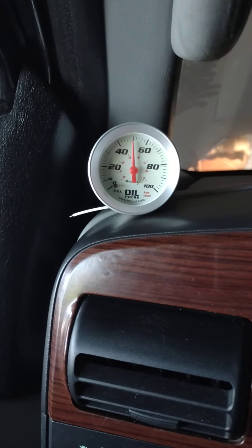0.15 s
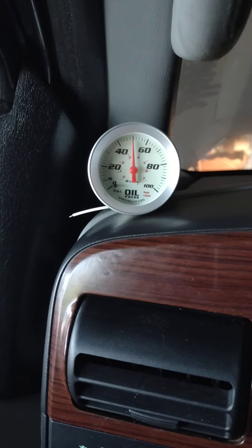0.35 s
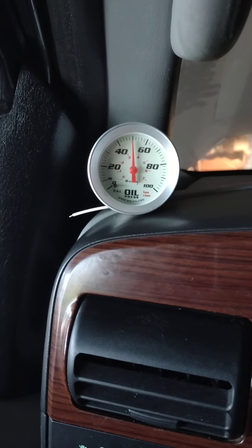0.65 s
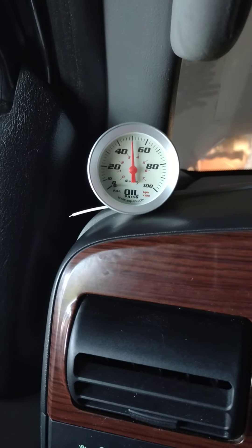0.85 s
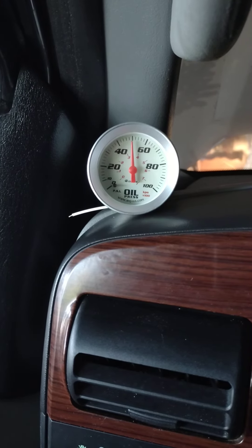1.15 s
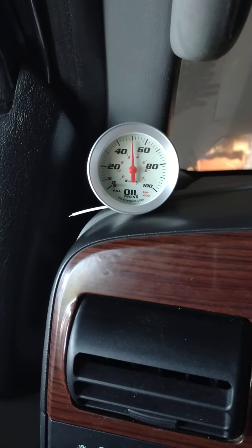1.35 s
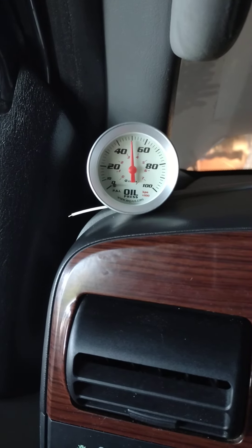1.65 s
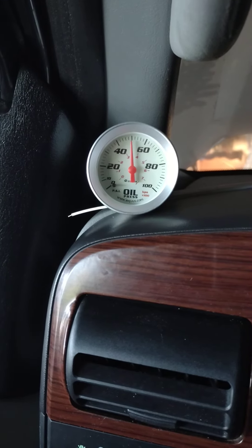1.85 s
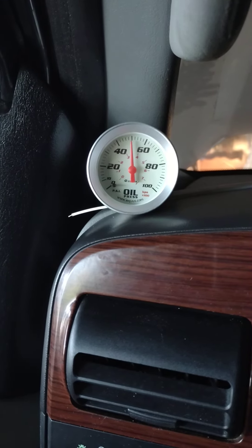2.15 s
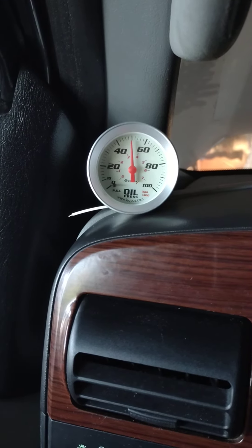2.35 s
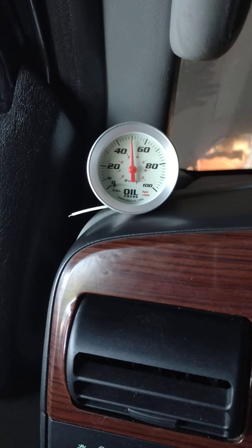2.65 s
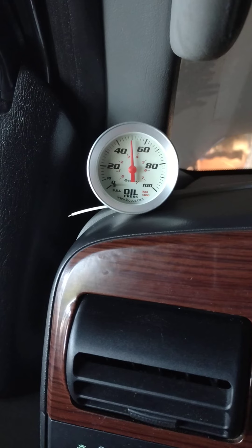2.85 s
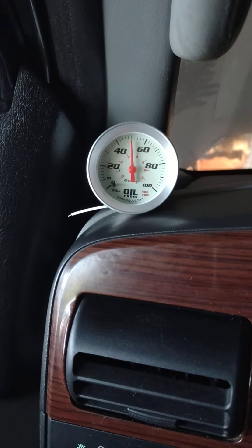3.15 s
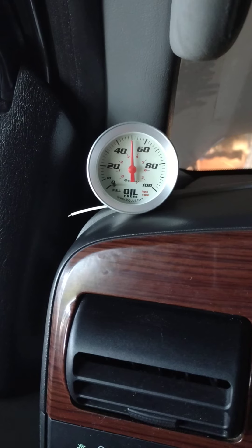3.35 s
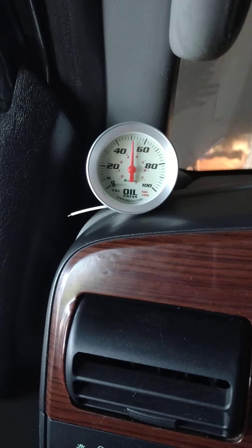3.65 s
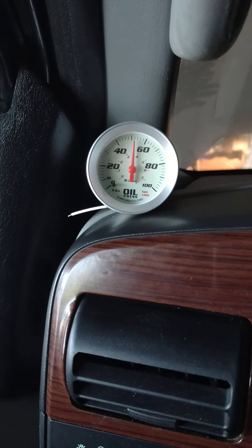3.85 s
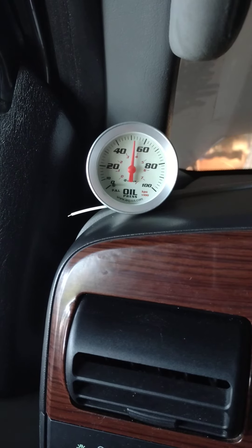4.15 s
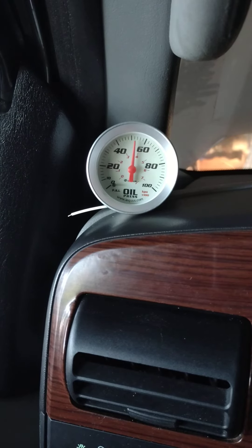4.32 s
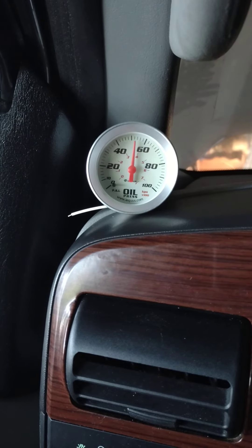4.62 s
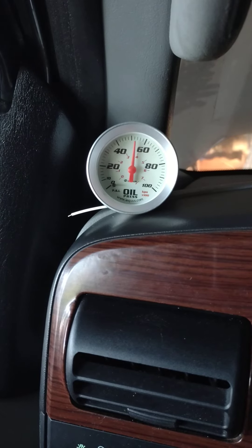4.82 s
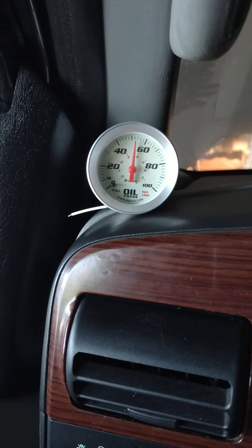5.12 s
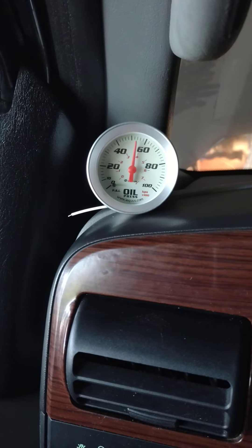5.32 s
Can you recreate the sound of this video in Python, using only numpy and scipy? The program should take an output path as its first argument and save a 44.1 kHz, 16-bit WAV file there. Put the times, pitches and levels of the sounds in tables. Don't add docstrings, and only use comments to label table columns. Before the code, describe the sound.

A V8 truck engine idles with a low uneven burble inside the cab, plastic clicks twice, then two throttle blips roar up.

```python
import sys
import numpy as np
from scipy import signal
from scipy.fft import rfft, irfft, next_fast_len
from scipy.io import wavfile
from scipy.ndimage import uniform_filter1d, map_coordinates

SR = 44100
rng = np.random.default_rng(int(sys.argv[2]) if len(sys.argv) > 2 else 0)


def invert_db(level):
    return 10 ** (np.asarray(level, dtype=float) / 20)


def inscribe(sig):
    pcm = np.round(np.clip(np.atleast_2d(sig).T, -1, 1) * 32767)
    wavfile.write(sys.argv[1], SR, pcm.astype(np.int16))


N = 241602

IDLE_HZ, MIDDLE_HZ = 5.5, 10
STEP = 32


def unit(x):
    return x / np.sqrt(np.mean(x ** 2) + 1e-20)


def curves(rows):
    time_s, *columns = np.transpose(rows)
    return [np.interp(np.arange(N) / SR, time_s, column) for column in columns]


def wobble(rate_hz, step=1):
    knots = rng.standard_normal(int(N * rate_hz / SR) + 4)
    return map_coordinates(knots, [np.arange(0, N, step) * rate_hz / SR])


def bell(hz, centre_hz, width_hz):
    return 1 / (1 + (2 * (hz - centre_hz) / width_hz) ** 2)


def noise(spectrum, rings=(), count=N):
    size = next_fast_len(count + 8192)
    hz = np.fft.rfftfreq(size, 1 / SR)
    f, level_db = np.transpose(spectrum)
    db = np.interp(np.log(hz + 1), np.log(f + 1), level_db)
    db = db + sum(lift_db * bell(hz, centre, width) for centre, width, lift_db in rings)
    return unit(irfft(rfft(rng.standard_normal(size)) * invert_db(db), size)[:count])


def modes(table, hz):
    return sum(gain * 1j * hz * width / (f * f - hz * hz + 1j * hz * width) for f, width, gain in table)


def firing_beat(angle):
    return np.cos(2 * np.pi * 8 * angle)


def near_bank(angle):
    return np.cos(2 * np.pi * (angle - .91))


# f/Hz, level/dB per Hz
RUMBLE_SPECTRUM = [(12, -40), (25, -16), (45, -3), (90, 2), (150, 0), (215, 0), (245, -8), (450, -10),
                   (600, -30), (1000, -90)]
# f/Hz, level/dB per Hz
CAB_SPECTRUM = [(210, -26.5), (350, -7.5), (468, -8.5), (520, -9.5), (813, -11), (1130, -15), (1490, -16),
                (2200, -19), (3050, -24.5), (3350, -35), (5000, -38), (7600, -41.5), (8100, -58),
                (8300, -120)]
# f/Hz, width/Hz, lift/dB
DASH_RINGS = [(295, 14, 4), (403, 16, 4), (463, 12, 7), (625, 40, 3), (702, 16, 3), (1500, 60, 3)]


def cab_noise():
    rumble = invert_db(-56) * noise(RUMBLE_SPECTRUM)
    return rumble + invert_db(-60 + 0.1 * wobble(9.8)) * noise(CAB_SPECTRUM, DASH_RINGS)


# t/s, snap level/dB, thud level/dB, ring f/Hz, treble tilt/dB per octave
TRIM_CLICKS = [
    (2.225, -36, -64, 2040, 2),
    (2.2299, -31, -43, 2000, 5),
    (2.238, -31.5, -75, 1563, -4.5),
    (2.6533, -42, -52, 1704, -11),
    (2.666, -54.5, -26, 850, -4),
]
# f/Hz, level/dB per Hz
TRIM_SPECTRUM = [(120, -39), (280, -6.5), (450, -15.5), (750, -1), (1100, -6.5), (1400, -4.5), (2000, -3),
                 (2420, -3.5), (3050, -10), (3600, -19), (4500, -18.5), (6500, -22.5), (7800, -27.5),
                 (8400, -48), (8800, -120)]
SNAP_T60_S, RING_T60_S, THUD_T60_S = 0.093, 0.034, 0.18
OVERTONE_RATIO = 1.94


def trim():
    out = np.zeros(N + SR)
    t = np.arange(SR // 4) / SR
    for start_s, snap_db, thud_db, ring_hz, tilt_db in TRIM_CLICKS:
        colour = [(hz, db + tilt_db * max(0, np.log2(hz / 3300))) for hz, db in TRIM_SPECTRUM]
        burst = invert_db(-60 * t / SNAP_T60_S) * noise(colour, count=len(t))
        ring = np.sin(2 * np.pi * ring_hz * t) + 0.23 * np.sin(2 * np.pi * OVERTONE_RATIO * ring_hz * t)
        snap = burst + invert_db(2.5 - 60 * t / RING_T60_S) * ring
        snap = invert_db(snap_db) * (1 - np.exp(-t / 0.00042)) * snap
        thud = invert_db(thud_db - 60 * t / THUD_T60_S) * (1 - np.exp(-t / 0.00064)) * np.sin(2 * np.pi * 122 * t)
        out[round(start_s * SR):][:len(t)] += snap + thud
    return out[:N]


# order, level/dB
BELT_ORDERS = [(53.9, -71), (73.3, -69.5), (84, -63), (127.5, -78)]


def belts(angle, cycle_hz):
    out = np.zeros(N)
    fade_db = -7 * np.log2(cycle_hz / IDLE_HZ)
    for order, db in BELT_ORDERS:
        level = invert_db(db + fade_db + 1.2 * wobble(8))
        out += level * np.sin(2 * np.pi * order * angle + .3 * wobble(12))
    return out


EDGE_HZ, EDGE_HZ_PER_OCTAVE, EDGE_HZ_PER_DB = 6800, 460, 10.5
FLOW_DB, FLOW_DB_PER_OCTAVE = -87.5, 10
CATCH_DB, CATCH_HZ, CATCH_WIDTH_HZ, SHUT_DB = -80.5, 9.4, 1.2, -24


def whistle(cycle_hz, throttle_db):
    octaves = np.log2(cycle_hz / MIDDLE_HZ)
    edge_hz = EDGE_HZ + EDGE_HZ_PER_OCTAVE * octaves + EDGE_HZ_PER_DB * throttle_db
    phase = 2 * np.pi * np.cumsum(edge_hz) / SR
    catch = invert_db(CATCH_DB + .25 * (SHUT_DB - throttle_db))
    catch = catch * np.exp(-((cycle_hz - CATCH_HZ) / CATCH_WIDTH_HZ) ** 4)
    flow = invert_db(FLOW_DB + FLOW_DB_PER_OCTAVE * octaves + 0.44 * throttle_db)
    upper = wobble(500) * np.sin(phase)
    lower = invert_db(-3) * wobble(400) * np.sin(.745 * phase)
    return (catch + flow) * (upper + lower)


# f/Hz, level/dB per Hz
SHIELD_SPECTRUM = [(1100, -59.5), (1350, -10), (1480, 5.5), (1600, -7.5), (1720, 1), (1900, -8.5),
                   (2100, -32), (2600, -82.5)]


def shield(angle, level):
    return level * invert_db(0.46 * wobble(25)) * (1 + 0.17 * firing_beat(angle)) * noise(SHIELD_SPECTRUM)


# f/Hz, width/Hz, lift/dB
COVER_RINGS = [(810, 83, 2.5), (1460, 110, 2), (1720, 70, 2), (2350, 120, 0.5), (2750, 130, 3.5),
               (4080, 59, 3)]
# f/Hz, level/dB per Hz
INTAKE_SPECTRUM = [(2000, -51), (3000, -11), (3400, 2), (4100, 0), (5200, -5), (5700, -10.5), (7000, -12.5),
                   (7700, -16), (8100, -36), (8300, -120)]


def intake(level):
    return level * invert_db(0.69 * wobble(20)) * noise(INTAKE_SPECTRUM, COVER_RINGS)


# f/Hz, level/dB per Hz
GEAR_SPECTRUM = [(320, -26), (550, -1), (770, 0.5), (1200, -3), (1270, -5), (1480, -6.5), (1600, -11.5),
                 (1740, -2), (2150, -10), (2420, -7), (3050, -16), (3960, -46), (6710, -120)]


def valve_gear(angle, level):
    pulse = 1 + 0.086 * firing_beat(angle)
    return level * invert_db(0.59 * wobble(11)) * pulse * noise(GEAR_SPECTRUM, COVER_RINGS)


# f/Hz, level/dB per Hz
KNOCK_SPECTRUM = [(230, -39.5), (292, 0), (350, -9), (460, -4.5), (590, -7), (720, -41), (900, -120)]


def floor_knock(angle):
    return invert_db(-67) * (.5 + .5 * near_bank(angle)) ** 2 * noise(KNOCK_SPECTRUM)


# f/Hz, level/dB per Hz
GROWL_SPECTRUM = [(25, -40), (45, -3.5), (100, -0.5), (220, -3.5), (245, -16.5), (300, -12), (420, -18),
                  (490, -33.5), (700, -37), (910, -58), (1540, -120)]
# f/Hz, width/Hz, lift/dB
PANEL_RINGS = [(163, 140, 7), (189, 48, -2.5), (215, 8.5, 8), (288, 9.2, 7.5), (376, 41, 6.5), (416, 12, 7)]


def growl(angle, level):
    pulse = 1 + 0.24 * firing_beat(angle)
    return level * invert_db(0.5 * wobble(40)) * pulse * noise(GROWL_SPECTRUM, PANEL_RINGS)


# level/dB, rise/dB per octave of speed, share/dB per dB of throttle
LAYER_LEVELS = [
    (-40.5, 10.5, 0.12),
    (-55.5, 12.5, 0.08),
    (-76.5, 10, .22),
    (-69.5, 14.5, -0.38),
]
WAKE_HZ, BUZZ_FROM_HZ, BUZZ_SPAN_HZ = 5.6, 8.6, 2.2
SURGE_DB = 2


def layer_levels(cycle_hz, throttle_db):
    octaves = np.log2(cycle_hz / MIDDLE_HZ)
    awake = np.clip(14 * (cycle_hz / WAKE_HZ - 1), .03, 1)
    levels = [awake * invert_db(db + rise_db * octaves + share * throttle_db) for db, rise_db, share in LAYER_LEVELS]
    surge = uniform_filter1d(np.gradient(np.log2(cycle_hz)) * SR, size=SR // 10)
    levels[0] = levels[0] * invert_db(SURGE_DB * np.clip(surge, 0, None))
    levels[-1] = levels[-1] * np.clip((cycle_hz - BUZZ_FROM_HZ) / BUZZ_SPAN_HZ, .1, 1)
    return levels


# exhaust level/dB, exhaust lag/crank deg, block level/dB, block lag/crank deg
CYLINDER_BLOWS = [(-9.6, -3.0, 0.5, -37.2), (2.9, -5.1, -5.3, -50.5), (4.4, -5.5, -4.9, -26.6),
                  (1.2, -6.5, 2.4, -37.6), (4.4, -8.4, 1.1, -44.0), (3.5, -9.8, -0.3, -41.3),
                  (-6.6, 24.6, -1.1, -38.8), (-0.2, -12.4, 7.6, -44.3)]
# f/Hz, width/Hz, signed gain
BOOM_MODES = [(57.27, 11.0, 1.23), (95.61, 26.8, -1.46), (126.9, 26.99, 0.52)]
# f/Hz, width/Hz, signed gain
BLOCK_MODES = [(148, 34, -.5), (210, 20.7, -2.09), (213.9, 18.9, 2.05), (279.3, 40.6, -.08)]


def strength(order, cycle_hz, exhaust=1):
    exhaust_db, exhaust_lag_deg, block_db, block_lag_deg = np.transpose(CYLINDER_BLOWS)

    def blows(db, lag_deg):
        turns = np.arange(8) / 8 + lag_deg / 720
        return np.sum(invert_db(db) * np.exp(-2j * np.pi * order * turns))

    hz = order * cycle_hz
    bass_cut = (1j * hz / (70 + 1j * hz)) ** 2
    boom = exhaust * blows(exhaust_db, exhaust_lag_deg) * modes(BOOM_MODES, hz)
    block = blows(block_db, block_lag_deg) * modes(BLOCK_MODES, hz)
    return bass_cut * (boom + block)


STRONG_ORDERS = [
    5,
    6,
    7,
    8,
    16,
]
# pipe level/dB, mount level/dB, pipe change off idle/dB
STRONG_LEVELS = [(-16.5, -32, 0.5), (-36.5, -17, 1.5), (-41, -28.5, 0.5), (-10.5, -23.5, 0),
                 (-13, -36.5, -8)]
# f/Hz, level/dB
PIPE_RESPONSE = [(28, -46.5), (45, -31.5), (60, -13.5), (78, -17), (94, 1), (107, -4), (128, -7.5),
                 (148, -21.5), (290, -24)]
# f/Hz, width/Hz, lift/dB
TAIL_PIPE_RINGS = [(162, 12, 23), (298, 11, 13)]
# f/Hz, width/Hz, level/dB
MOUNT_MODES = [(95.1, 10.4, 0.5), (151, 18, -14.5), (208.9, 16, 5.5)]
# f/Hz, width/Hz, lift/dB
BODY_CANCEL = (101.8, 5, -17)


def strong(order, hz, throttle_db, revved):
    pipe_db, mount_db, revved_db = STRONG_LEVELS[STRONG_ORDERS.index(order)]
    f, db = np.transpose(PIPE_RESPONSE)

    def lift(centre_hz, width_hz, top_db):
        return top_db * revved * bell(hz, centre_hz, width_hz)

    pulse_db = pipe_db + revved_db * revved + throttle_db + np.interp(np.log(hz), np.log(f), db)
    pulse_db = pulse_db + lift(106, 1.7, -9)
    if order == STRONG_ORDERS[-1]:
        pulse_db = pulse_db + sum(lift(*ring) for ring in TAIL_PIPE_RINGS)
    body = sum(invert_db(top_db) * bell(hz, centre, width) for centre, width, top_db in MOUNT_MODES)
    shaking = revved * invert_db(mount_db + lift(*BODY_CANCEL)) * body
    return np.hypot(invert_db(pulse_db), shaking)


OVERRUN_SHARE, IDLE_THROTTLE_DB = .6, -13.5


def firing(cycle_hz, angle, load_db, throttle_db):
    out = np.zeros(N)
    samples = np.arange(N)
    slow_hz, slow_angle = cycle_hz[::STEP], angle[::STEP]
    slow_load_db, slow_throttle_db = load_db[::STEP], throttle_db[::STEP]
    revved = np.clip(slow_hz / IDLE_HZ - 1, 0, 1)
    shut_db = np.clip(slow_throttle_db - IDLE_THROTTLE_DB - 4 * (1 - revved), None, 0)
    exhaust = invert_db(OVERRUN_SHARE * shut_db * revved)
    for order in range(2, 60):
        hz = order * slow_hz
        if order in STRONG_ORDERS:
            phase = np.angle(strength(order, IDLE_HZ))
            size = strong(order, hz, slow_throttle_db, revved) * np.exp(1j * phase)
            scatter_db = .35 + (order / 9) ** 2 * revved
        else:
            drown_db = -8 * revved / (1 + (170 / hz) ** 4)
            size = strength(order, slow_hz, exhaust) * invert_db(-59.0 + slow_load_db + drown_db)
            scatter_db = 1.2 + 3 * revved
        if order in (3, 11):
            size = size * invert_db(4.2 * revved - 8 * revved / (1 + (200 / hz) ** 12))
        if 30 < order < 43:
            size = size * (.95 + .3 * near_bank(slow_angle))
        jitter = np.exp(.03j * order * revved * wobble(16, STEP))
        size = size * invert_db(scatter_db * wobble(9, STEP)) * jitter
        size = np.interp(samples, samples[::STEP], size)
        out += np.real(size * np.exp(2j * np.pi * order * angle))
    return out


# t/s, four-stroke cycles per s
SPEED_CURVE = [(0.0, 5.55), (0.5, 5.565), (1.1, 5.505), (2.3, 5.474), (3.0, 5.53), (3.165, 6.05),
               (3.3, 9.8), (3.45, 12.1), (3.63, 16.1), (3.73, 17.0), (3.9, 16.65), (4.3, 12.65),
               (4.58, 10.9), (4.85, 9.3), (5.0, 9.75), (5.15, 12.0), (5.27, 15.4), (5.48, 19.4)]
# t/s, level/dB (0 = wide open)
THROTTLE_CURVE = [(0, -12.5), (.7, -12.5), (1.5, -14), (2.7, -14.5), (3.1, -14.5), (3.2, -13),
                  (3.31, -14.5), (3.34, 1.5), (3.6, -1.5), (3.72, -6), (3.87, -10), (3.96, -24),
                  (4.85, -32), (4.92, -16), (5.02, -10), (5.09, -1.5), (5.33, 1), (5.48, -0.5)]
# cycles per s, level/dB
BURN_CURVE = [(5.5, -1.5), (7.5, 2), (9.5, 0), (12, 5), (14, 13.5), (17, 12)]
START_CYCLES = -.018
BURN_DB_PER_THROTTLE_DB = 0.086


def scene():
    (cycle_hz,), (throttle_db,) = curves(SPEED_CURVE), curves(THROTTLE_CURVE)
    angle = START_CYCLES + np.cumsum(cycle_hz) / SR
    load_db = np.interp(cycle_hz, *np.transpose(BURN_CURVE)) + BURN_DB_PER_THROTTLE_DB * throttle_db
    growl_level, gear_level, intake_level, shield_level = layer_levels(cycle_hz, throttle_db)
    mix = cab_noise() + trim()
    mix += belts(angle, cycle_hz) + whistle(cycle_hz, throttle_db)
    mix += shield(angle, shield_level) + intake(intake_level) + valve_gear(angle, gear_level)
    mix += floor_knock(angle) + growl(angle, growl_level)
    mix += firing(cycle_hz, angle, load_db, throttle_db)
    return mix[None]


def top_cut(x):
    return signal.sosfilt(signal.butter(12, 8230, fs=SR, output="sos"), x)


def record(dry):
    return top_cut(dry)


dry = scene()
out = record(dry)
inscribe(out)
```